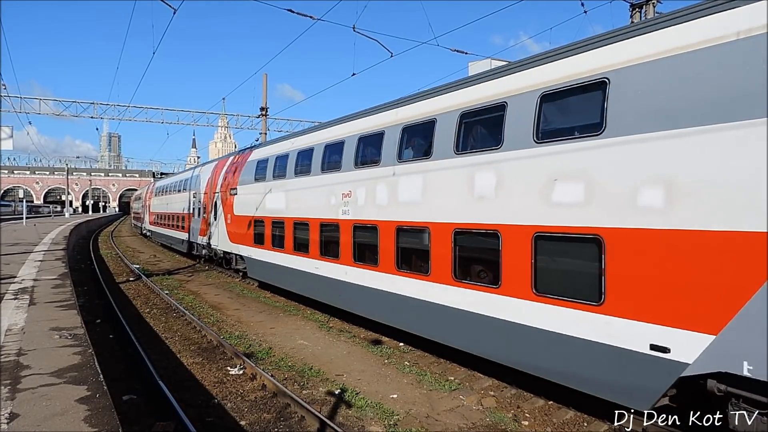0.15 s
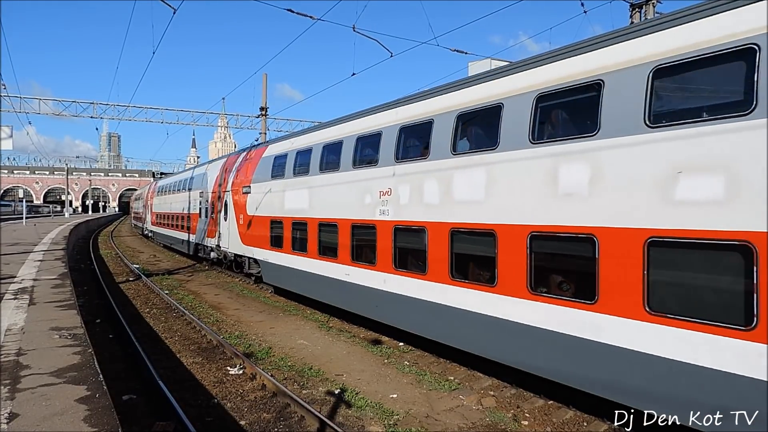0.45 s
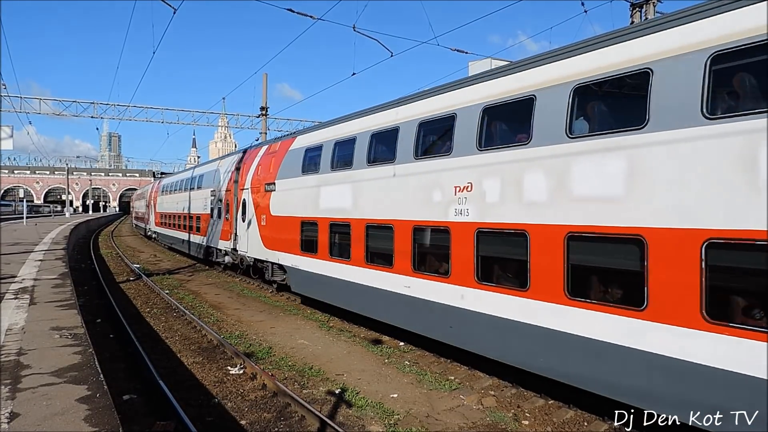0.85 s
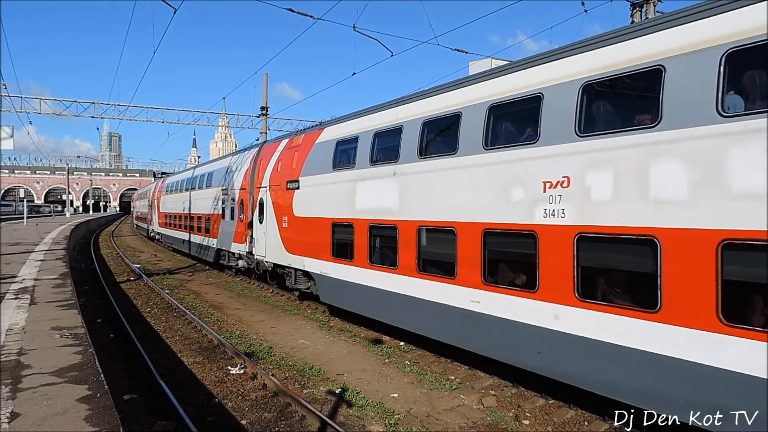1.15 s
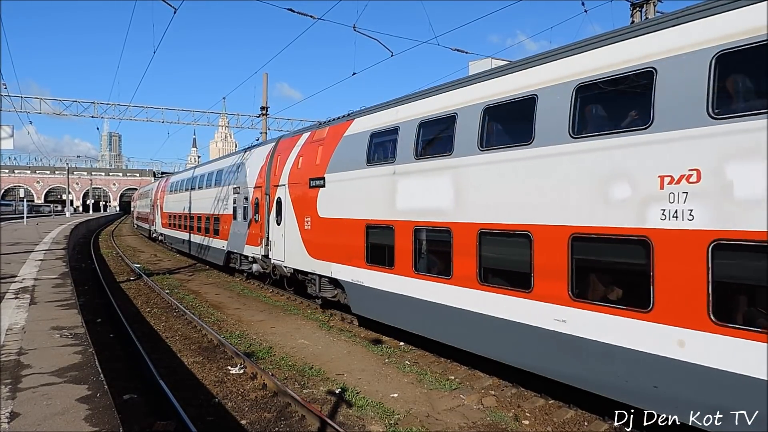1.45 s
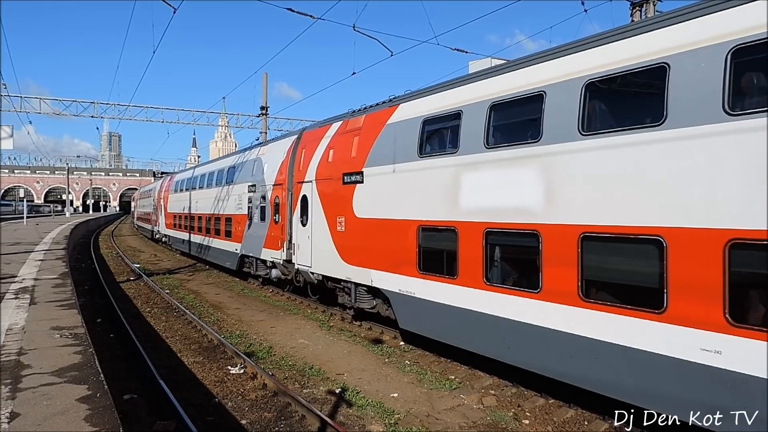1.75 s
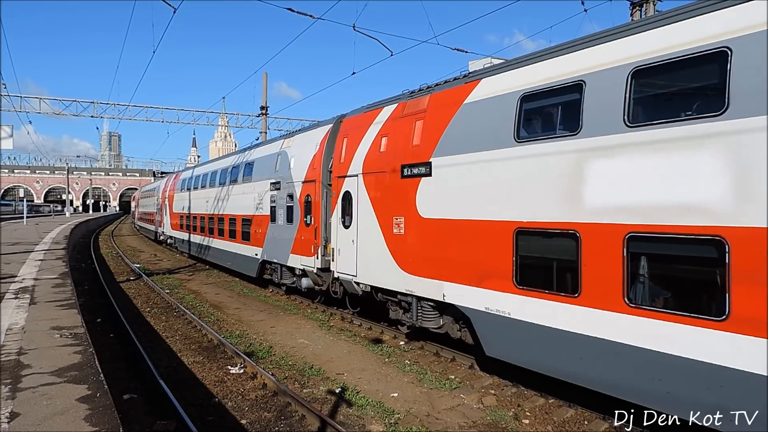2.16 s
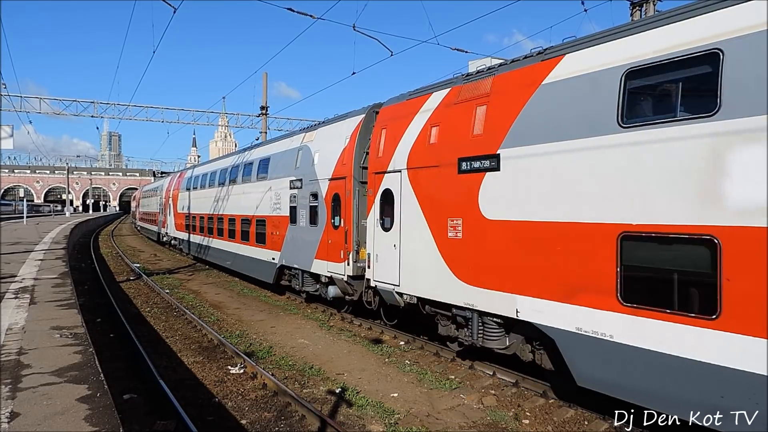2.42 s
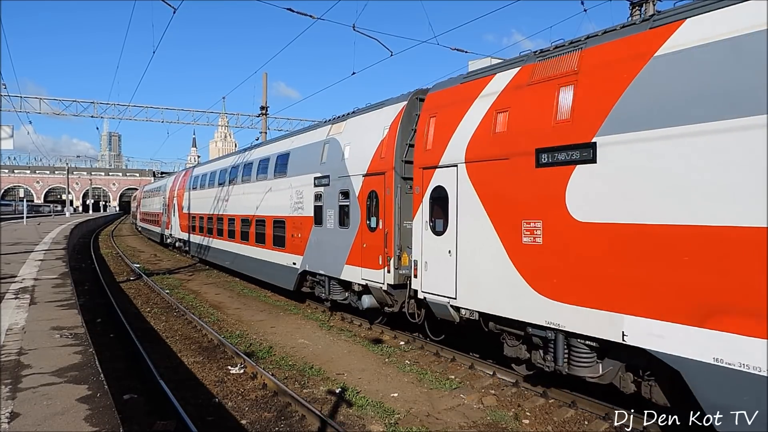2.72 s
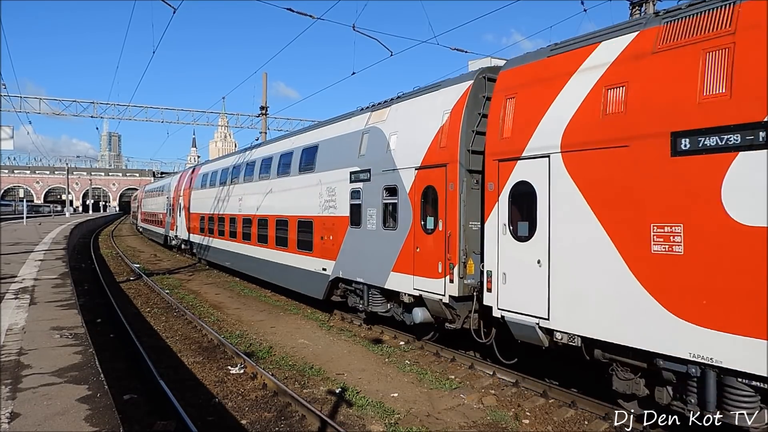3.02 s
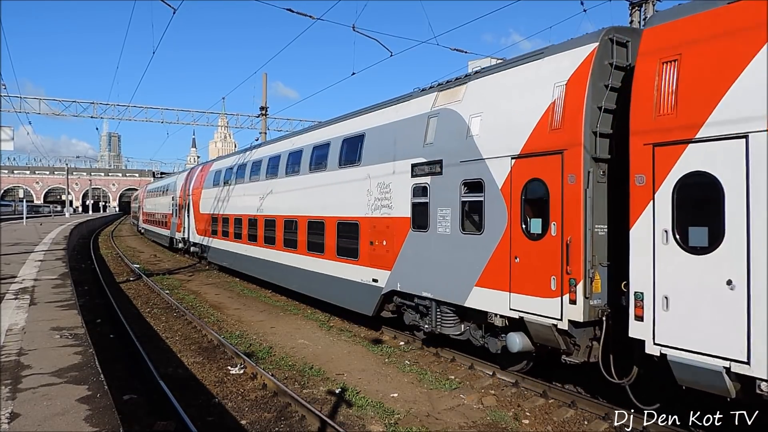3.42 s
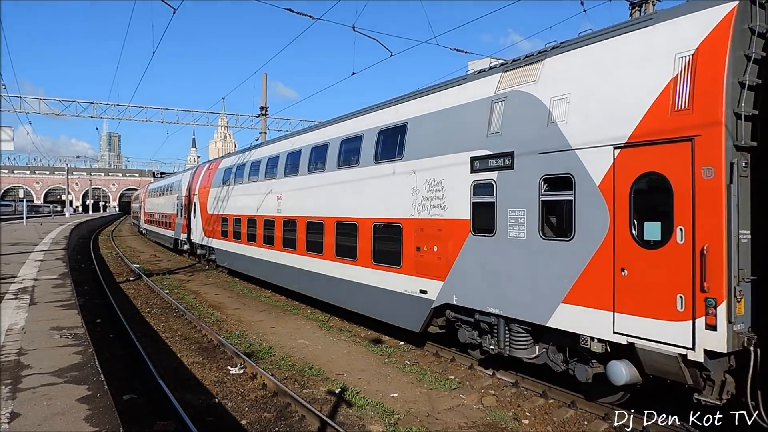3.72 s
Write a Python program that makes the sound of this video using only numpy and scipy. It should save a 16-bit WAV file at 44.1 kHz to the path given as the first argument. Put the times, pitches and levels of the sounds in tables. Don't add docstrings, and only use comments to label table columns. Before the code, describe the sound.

Train wheels roll slowly past close by outdoors, two hollow thuds first, then several looser metallic clatters from a farther joint, and one brighter thud near the end, over steady rumble and light wind on the stereo microphone.

```python
import sys
import numpy as np
from scipy import signal
from scipy.fft import rfft, irfft, next_fast_len
from scipy.io import wavfile

SR = 44100
rng = np.random.default_rng(int(sys.argv[2]) if len(sys.argv) > 2 else 0)


def transcribe(u):
    v = np.clip(np.atleast_2d(u).T, -1, 1)
    q = np.round(v * 32767).astype(np.int16)
    wavfile.write(sys.argv[1], SR, q)


def volts_from_db(level):
    exponent = np.asarray(level, float) / 20
    return 10 ** exponent


N = 169785

# (time [s], level [dB], treble against the usual colour [dB])
ROLLING_LOAD = [(0.0, -43, -9.5), (0.15, -38, -13.5), (0.35, -34, -9.5), (0.78, -36, -12), (1.03, -40, -12),
                (1.95, -38, -10), (2.09, -35, -15), (2.39, -35, -12), (2.58, -34.5, -15), (2.7, -33, -8.5),
                (2.92, -37, -14), (3.13, -40.5, -7), (3.32, -36.5, -10), (3.85, -38, -10)]
# (frequency [Hz], level per Hz [dB])
ROLLING_SPECTRUM = [(25, 4), (60, 4), (240, -5), (450, -3.5), (620, -13), (1700, -22), (4500, -40),
                    (13000, -45)]
# (frequency [Hz], rolling level [dB], near joint level [dB], far joint level [dB])
MODES = [(248.5, -1, -11.5, -4), (297, -1.5, -3, -6), (372, 2.5, -6.5, 5.5), (474, -17, 13.5, -6),
         (816, -6, -28, 0.5), (947, -4, -63, 2.5), (1450, -19, -8, 5), (1555, -2.5, -8, -2),
         (1679, -51, -3.5, -49), (2062, -7, -28, -4), (2235, -8.5, -23, 0), (2850, -11, -7.5, -19),
         (3320, -20, -36, -23), (4300, -40, -47, -36)]
# (time [s], level [dB], contact length [s], tilt [dB per octave])
NEAR_BLOWS = [
    (0.421, -22, 0.0026, 3),
    (0.834, -22, 0.002, 5),
    (3.533, -25.5, 0.0019, 8.5),
]
# (time [s], level [dB], contact length [s], tilt [dB per octave])
FAR_BLOWS = [
    (1.5, -22.5, 0.04, -6.5),
    (1.912, -23, 0.058, -3.5),
    (2.405, -26, 0.11, -5.5),
    (2.69, -23, 0.027, -1),
    (3.095, -22, 0.048, -7),
]
# (time [s], frequency [Hz], peak level [dB], hold [s])
KNOCKS_ON_MODES = [(.401, 226, -15, .004), (.421, 216, -2.5, 0.006), (.424, 1598, -16.5, 0.0079),
                   (.432, 483, -11, 0.015), (.438, 251.6, -9, 0.0091), (.454, 450, -19, 0.01),
                   (.835, 363, -8.5, 0.0069), (.836, 780, -44, 0.0029), (.838, 237, -7.5, 0.0025),
                   (.846, 407, -23, 0.018), (.853, 1730, -31, 0.0034), (.862, 1500, -25, .006),
                   (.876, 1610, -24, .003), (1.502, 800, -22, 0.021), (1.508, 1410, -23, 0.0054),
                   (1.514, 340, -16.5, 0.002), (1.521, 1630, -21, 0.0027), (1.522, 360, -14, 0.0055),
                   (1.535, 370, -22, 0.0099), (1.54, 940, -21, 0.0078), (1.552, 970, -29, 0.006),
                   (1.553, 412, -27, 0.011), (1.918, 1020, -19, 0.0022), (1.928, 1600, -24, 0.012),
                   (1.93, 256, -21, 0.0043), (1.948, 924, -16.5, 0.0076), (1.976, 380, -19, 0.0071),
                   (1.995, 430, -26, 0.027), (2.408, 103, -16, 0.021), (2.43, 740, -26.5, 0.0038),
                   (2.455, 303, -27, 0.0045), (2.487, 850, -25.5, 0.0059), (2.515, 382, -28, 0.0076),
                   (2.524, 880, -22.5, .005), (2.545, 155, -15, 0.011), (2.654, 380, -18, 0.0065),
                   (2.699, 414, -12, .004), (2.704, 780, -19.5, 0.0058), (2.708, 324, -10.5, 0.0066),
                   (2.727, 1043, -26, 0.019), (2.728, 336, -13, 0.006), (3.095, 1553, -28, 0.013),
                   (3.102, 343, -21.5, 0.0085), (3.113, 984, -18, 0.0062), (3.117, 305, -17, 0.012),
                   (3.128, 788, -17.5, 0.0091), (3.535, 240, -5.5, 0.0034), (3.534, 1626, -11.5, 0.0031),
                   (3.538, 185, -17.5, 0.0125), (3.546, 308, -13.5, .012)]
# (time [s], frequency [Hz], level [dB], hold [s])
SINGING_MODES = [(.836, 1770, -30, .012), (.84, 3600, -38, .015), (1.5, 800, -29, .025),
                 (1.515, 2290, -37, .015), (1.53, 4820, -55, .06), (1.924, 960, -28, .035),
                 (1.922, 1565, -32, .03), (1.925, 2650, -42, .04), (2.7, 2330, -34, .01),
                 (2.74, 1565, -39, .02), (2.83, 4850, -52, .06), (3.1, 1565, -31, .03),
                 (3.11, 2280, -37, .012), (3.15, 2050, -46, .09), (3.27, 975, -41, .09),
                 (3.56, 1560, -40, .04), (3.545, 4810, -54, .085), (3.605, 3300, -49, .025),
                 (3.64, 2700, -51, .04), (3.61, 4810, -51, .02)]
# (time [s], level [dB], hold [s], T60 [s], tilt [dB per octave])
FLANGE_CRACKS = [(0.315, -44, .05, .1, 1.5), (2.404, -42, 0.13, 0.3, 0.5), (3.4, -52, 0.15, .1, 5),
                 (0.419, -22.5, 0.01, 0.13, -2), (0.833, -22.5, 0.0084, 0.059, -0.5),
                 (0.848, -31.5, 0.06, 0.23, 4), (0.923, -45, 0.21, 0.34, 2), (1.5, -33.5, 0.004, 0.11, 6),
                 (1.505, -32, 0.018, 0.53, 1), (1.909, -32, 0.018, 0.57, 2.5),
                 (2.688, -48.5, 0.0088, 0.056, 10.5), (2.7, -24, 0.0085, 0.2, 1),
                 (3.086, -42, 0.029, 0.18, 5.5), (3.105, -31, 0.01, 0.58, 0),
                 (3.534, -22.5, 0.0081, 0.081, -1.5), (3.56, -40.5, 0.027, 0.56, 2),
                 (3.792, -41, 0.0027, 0.036, -7)]
# (frequency [Hz], level per Hz [dB])
CRACK_SPECTRUM = [(600, 13.5), (900, -0.5), (1600, -7), (2300, -5.5), (4200, -20.5), (8000, -35),
                  (13000, -34)]
# (time [s], level [dB])
TREBLE_TICKS = [
    (1.5, -53),
    (2.687, -40),
    (3.53, -62),
]
# (time [s], frequency of its third partial [Hz], level [dB])
CONVERTER_WHINE = [(2.3, 15320, -77), (2.37, 15320, -78), (2.388, 15320, -90), (2.418, 15320, -74),
                   (2.454, 15318, -86), (2.48, 15318, -74), (2.66, 15315, -77), (2.69, 15315, -130),
                   (2.835, 15310, -130), (2.86, 15310, -72), (3.07, 15305, -68), (3.136, 15300, -84),
                   (3.162, 15300, -76), (3.4, 15290, -79), (3.488, 15275, -71), (3.56, 15265, -76),
                   (3.6, 15258, -68), (3.85, 15240, -67)]
# (time [s], level [dB], length [s], cutoff [Hz])
WIND_GUSTS = [(0.259, -29, 0.063, 196), (0.322, -24.5, 0.12, 263), (0.608, -36.5, 0.069, 197),
              (1.069, -30.5, 0.013, 248), (1.212, -38, 0.071, 152), (1.33, -31, 0.017, 246),
              (1.402, -18.5, 0.02, 279), (1.6, -36, 0.059, 205), (2.103, -30, 0.19, 187),
              (2.408, -25.5, 0.051, 259), (2.49, -21.5, 0.045, 324), (2.657, -19, 0.037, 364),
              (2.798, -28.5, 0.14, 306), (3.456, -32.5, 0.054, 195), (3.655, -33.5, 0.22, 203)]

WHEEL_T60_S = 0.1
NEAR_LAG_S, FAR_LAG_S, TRAIN_LAG_S = 0.00014, 0.000073, 0.00014


def rms_one(x):
    return x / np.sqrt(np.mean(x ** 2) + 1e-20)


def in_time(rows):
    s, *columns = np.transpose(rows)
    return [np.interp(np.arange(N) / SR, s, c) for c in columns]


def at_hz(points, hz):
    table_hz, db = np.transpose(points)
    return np.interp(np.log(hz), np.log(table_hz), db)


def drift(rate):
    every = 40
    r = np.exp(-2 * np.pi * rate * every / SR)
    white = rng.standard_normal(N // every + 2002)
    slow = signal.lfilter([1], [1, -2 * r, r * r], white)[2000:]
    return np.interp(np.arange(N) / every, np.arange(len(slow)), rms_one(slow))


def bandpass(x, order, low, high):
    return signal.sosfilt(signal.butter(order, [low, high], "band", fs=SR, output="sos"), x)


def highpass(x, order, hz):
    return signal.sosfilt(signal.butter(order, hz, "high", fs=SR, output="sos"), x)


def ring(force, hz, t60):
    r, w = volts_from_db(-60 / (t60 * SR)), 2 * np.pi * hz / SR
    return signal.lfilter([0, np.sin(w)], [1, -2 * r * np.cos(w), r * r], force + 1e-18)


def pair(force, hz, t60):
    return ring(force, hz, t60) + 0.5 * ring(force, hz * 1.02, t60)


def shape(s, rise, hold, t60, size=N):
    out, start = np.zeros(size), int(s * SR)
    t = np.arange(min(size - start, int((rise + hold + 1.5 * t60) * SR))) / SR
    decay = volts_from_db(-60 * np.clip((t - rise - hold) / t60, 0, 2))
    out[start:start + len(t)] = np.clip(t / rise, 0, 1) * decay
    return out


def bands(white, gain_at):
    edges = 22 * 2 ** np.arange(0, 9.6, 0.5)
    out = 0
    for k, (low, high) in enumerate(zip(edges, edges[1:])):
        out = out + gain_at(np.sqrt(low * high)) * bandpass(white[k % 2], 2, low, high)
    return out


def ports(x, lag_s):
    size = next_fast_len(N + 64)
    hz = np.arange(size // 2 + 1) / size * SR
    late = irfft(rfft(x, size) * np.exp(-2j * np.pi * hz * lag_s), size)[:N]
    return np.array([late, x])


def scattered(noise, db):
    return volts_from_db(db) * highpass(noise, 2, 800)


def rolling():
    load_db, treble_db = in_time(ROLLING_LOAD)
    swing, together = load_db - load_db.mean(), drift(15.0)

    def gain(hz):
        treble = treble_db * np.clip(np.log2(hz / 4300), 0, 1)
        flutter = 1.2 * together + 1.33 * drift(26.6)
        return volts_from_db(at_hz(ROLLING_SPECTRUM, hz) + swing + treble + flutter)

    roar = bands(rng.standard_normal((2, 3, N)), gain)
    roar = roar / np.std(roar[0])
    rough = rng.standard_normal(N)
    rung = sum(volts_from_db(db + 2 * drift(6.8)) * rms_one(pair(rough, hz, WHEEL_T60_S)) for hz, db, *_ in MODES)
    direct = roar[0] + volts_from_db(swing - 6) * rms_one(rung)
    return volts_from_db(load_db.mean() + 7.5) * (ports(direct, TRAIN_LAG_S) + scattered(roar[1:], 4))


def joint(blows, column, rise, blow, damp, scatter_db):
    touches_per_s, shake_t60_s, contact_hz = 1100, 0.36, 3500
    out = np.zeros(N)
    for s, db, hold, tilt_db in blows:
        start, n = int(s * SR), SR // 3
        chance, size, sign = rng.random((3, n))
        strengths = rng.normal(0, 1, len(MODES))
        touches = (chance < touches_per_s / SR) * (0.12 + size) * np.sign(sign - 0.5)
        touches = touches * shape(0, rise, hold, shake_t60_s, n)
        touches[int(rise * SR)] = blow
        touches = signal.sosfilt(signal.butter(2, contact_hz, fs=SR, output="sos"), touches)
        body = 0
        for (hz, *levels_db), strength in zip(MODES, strengths):
            mode_db = levels_db[column] + tilt_db * np.log2(hz / 300) + scatter_db * strength
            body = body + volts_from_db(mode_db) * pair(touches, hz, damp * WHEEL_T60_S)
        loud_part = body[:int((rise + hold + 0.015) * SR)]
        out[start:start + n] += (volts_from_db(db) * body / np.std(loud_part))[:N - start]
    return out


def thump():
    force = np.zeros(N)
    for s, db, *_ in NEAR_BLOWS:
        force[int((s + 0.004) * SR)] = volts_from_db(db + 8.5)
    return ring(force, 59, 0.164)


def knocks():
    t = np.arange(N) / SR
    waver = 0.12 * np.array([drift(60) for _ in range(5)])
    out = 0
    for k, (s, hz, db, hold) in enumerate(KNOCKS_ON_MODES):
        tone = np.sin(2 * np.pi * (hz * (t - s) + waver[k % 5]))
        out = out + volts_from_db(db) * tone * shape(s, 0.0013, hold, 0.022)
    return out


def singing():
    t = np.arange(N) / SR
    out = 0
    for s, hz, db, hold in SINGING_MODES:
        level = volts_from_db(db + 3 + 3 * drift(60))
        tone = np.sin(2 * np.pi * (hz * t + 0.1 * drift(70)))
        out = out + level * tone * shape(s, 0.005, hold, 0.14)
    return out


def cracks():
    def gain(hz):
        if hz <= 600:
            return 0
        total = 0
        for s, db, hold, t60, tilt_db in FLANGE_CRACKS:
            level = volts_from_db(db + tilt_db * np.log2(hz / 1500))
            total = total + level * shape(s, 0.0033, hold, t60 * (hz / 1500) ** -0.2)
        return volts_from_db(at_hz(CRACK_SPECTRUM, hz)) * total

    grit = volts_from_db(2.5 * drift(90))
    noise = 3.62 * grit * bands(rng.standard_normal((2, 3, N)), gain)
    return ports(noise[0], TRAIN_LAG_S) + scattered(noise[1:], 3.4)


def ticks():
    noise = bandpass(rng.standard_normal((2, N)), 4, 9000, 15700)
    return noise * sum(volts_from_db(db) * shape(s, 0.002, 0.006, 0.03) for s, db in TREBLE_TICKS)


def converter():
    start_s = 2.29
    third_hz, db = in_time(CONVERTER_WHINE)
    turn = 2 * np.pi * np.cumsum((third_hz + 8 * drift(15)) / 3) / SR
    tone = volts_from_db(3 * drift(14)) * np.sin(3 * turn)
    tone = tone + volts_from_db(-5 + 5 * drift(8)) * np.sin(2 * turn) + volts_from_db(-8) * np.sin(turn)
    fade_in = np.clip((np.arange(N) / SR - start_s) / 0.02, 0, 1)
    return np.sqrt(2) * volts_from_db(db) * fade_in * tone


def wind():
    gusts = 0
    for s, db, length, cut_hz in WIND_GUSTS:
        noise = bandpass(rng.standard_normal((2, N)), 3, 70, cut_hz)
        during = noise[:, int(s * SR):int((s + length + 0.01) * SR)]
        noise = noise / np.std(during, axis=1, keepdims=True)
        gusts = gusts + volts_from_db(db) * noise * shape(s, 0.012, length, 0.033)
    breeze = bandpass(rng.standard_normal((2, N)), 2, 25, 85)
    gusts = gusts + 0.4 * gusts[0]
    gusts = gusts * volts_from_db(2 * drift(87)) * volts_from_db([[0], [-14]])
    return gusts + volts_from_db(-38 + 2 * drift(1.7)) * rms_one(breeze) * volts_from_db([[0], [-4]])


def scene():
    near = joint(NEAR_BLOWS, 1, rise=0.0032, blow=4.0, damp=0.99, scatter_db=-3.5)
    near = ports(near + thump() + knocks(), NEAR_LAG_S)
    far = joint(FAR_BLOWS, 2, rise=0.007, blow=1.2, damp=0.56, scatter_db=8.5)
    far = ports(far + singing(), FAR_LAG_S)
    top_limit = signal.cheby2(14, 50, 14000, fs=SR, output="sos")
    train = signal.sosfilt(top_limit, rolling() + near + far + cracks())
    train = train + converter() + ticks()
    treble = highpass(train, 1, 1480)
    return train + treble * (volts_from_db([[-0.8], [0.8]]) - 1) + wind()


def top_cut(x):
    return signal.sosfilt(signal.butter(12, 15830, fs=SR, output="sos"), x)


def record(dry):
    mix = 1.092 * np.tanh(dry / 1.161)
    return top_cut(mix)


dry = scene()
out = record(dry)
transcribe(out)
```